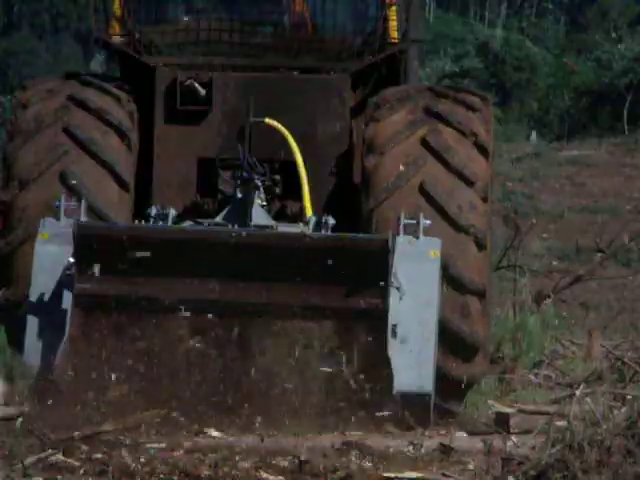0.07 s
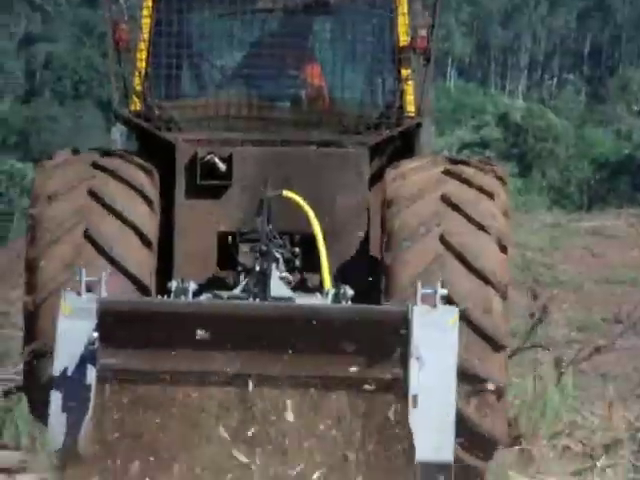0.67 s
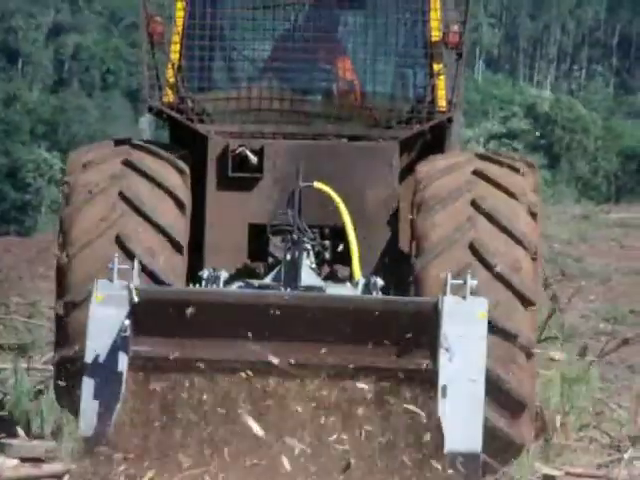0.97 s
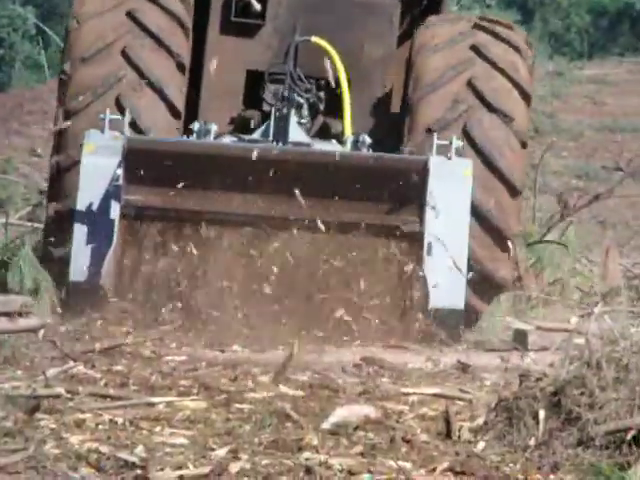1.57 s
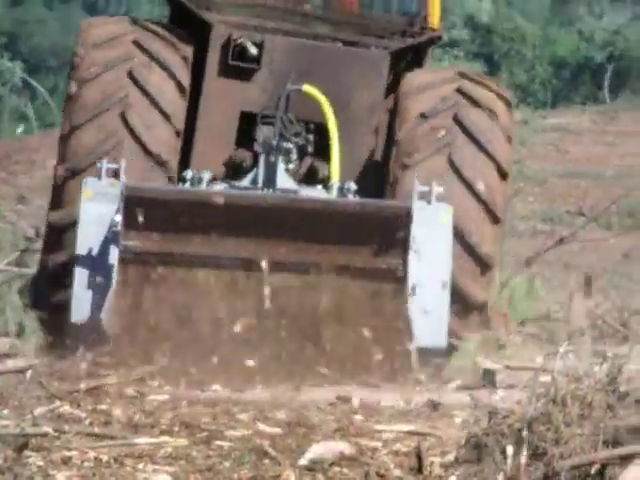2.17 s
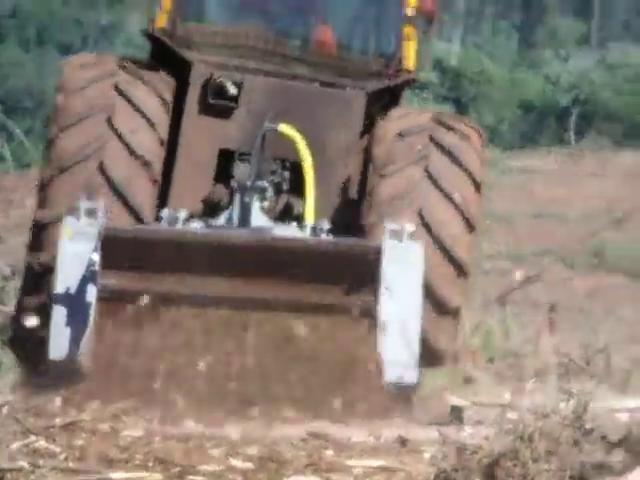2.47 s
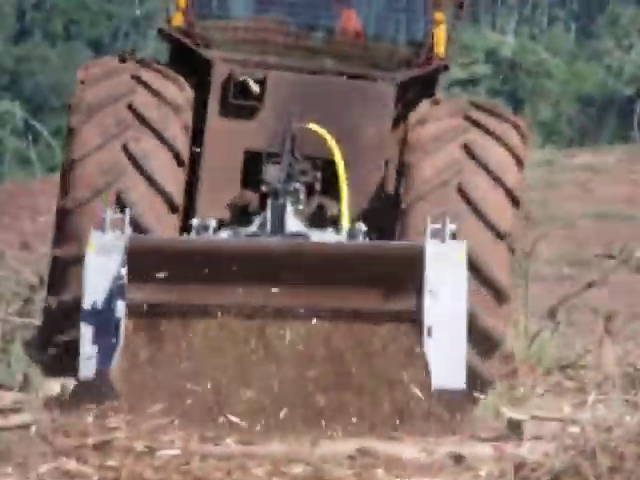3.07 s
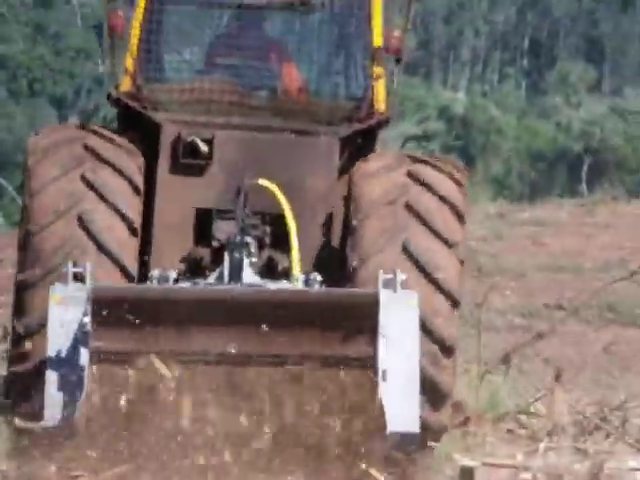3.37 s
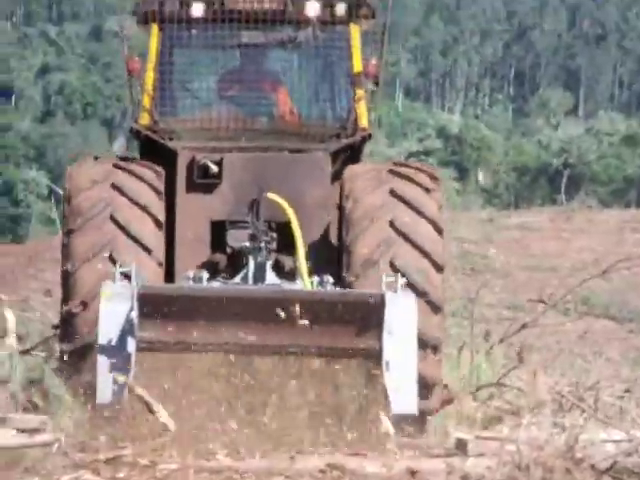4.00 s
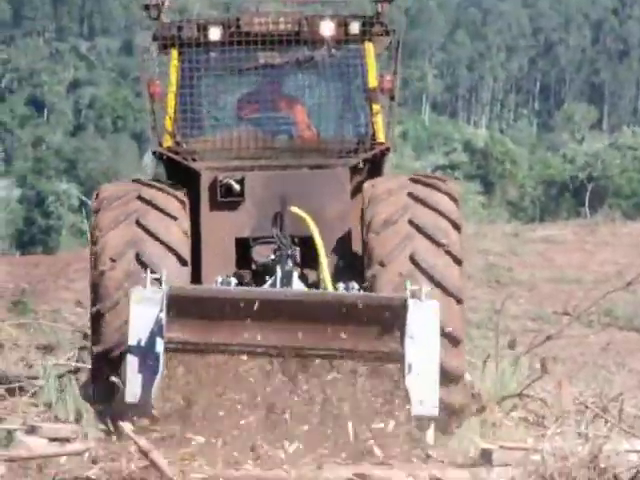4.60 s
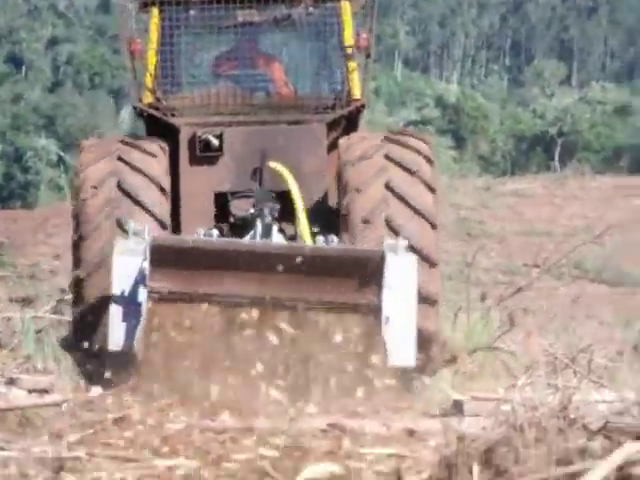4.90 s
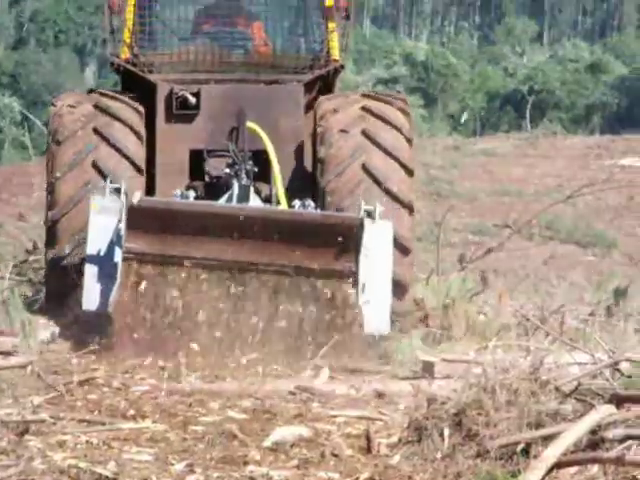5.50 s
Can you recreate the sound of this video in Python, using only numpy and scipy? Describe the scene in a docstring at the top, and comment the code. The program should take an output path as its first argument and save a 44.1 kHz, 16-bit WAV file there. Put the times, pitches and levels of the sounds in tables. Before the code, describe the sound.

A tractor's mulcher is heard shredding wood from the very start, a loud, harsh roar of drumming steel plates and crackling splinters that continues for the whole of nearly six seconds. It surges briefly and irregularly as branches are pulled in, notably around 0.6, 1.8, 3.1 and 3.9 seconds, and eases a little near 2.5 seconds. Sticks snap sharply throughout, with a strong crack at 0.3 seconds and a cluster between 4.1 and 5 seconds. Lumps of wood knock on the steel hood now and then, most clearly at about 3.2 and 4 seconds. A steady diesel hum and a faint gear whine sit underneath. Wind rumbles on the microphone, with thumping gusts near 1.3 seconds, repeatedly from 1.8, strongest from 3.2 to 3.9, and again around 5 seconds. The open field gives no echo; the treble is slightly dull and the loudest peaks overload.

```python
"""First comes the harsh, crackling roar of a tractor's mulcher chewing through wood in an open field.
Its spinning teeth hammer wood against a steel hood and tear it into splinters; sticks crack and
lumps knock on the plates. The diesel engine and a whining drive hum underneath. Gusts of wind
thump a dull-sounding microphone that overloads on the loudest peaks."""
import sys
import numpy as np
from scipy import signal
from scipy.fft import rfft, irfft
from scipy.io import wavfile
from scipy.ndimage import uniform_filter1d

SR = 44100
rng = np.random.default_rng(int(sys.argv[2]) if len(sys.argv) > 2 else 0)


def output_pcm(signal):
    """Save a mono or channel-first signal as 16-bit PCM at the path in sys.argv[1].

    Samples are clipped to [-1, 1] before scaling.
    """
    pcm = np.clip(np.atleast_2d(signal).T, -1, 1) * 32767
    wavfile.write(sys.argv[1], SR, np.round(pcm).astype(np.int16))


N = 249165
TIME = np.arange(N) / SR


# Tone colours of the drumming plates, ringing hood and tearing wood: pitch_hz, level_db
DRUM_TONE = [(150, -19.5), (450, -24.5), (600, -15.5), (760, -4), (870, -2.5), (1040, -2.5), (1150, -10.5),
             (1400, -11), (2500, -42), (6000, -90)]
HOOD_TONE = [(600, -33), (1150, -13), (1320, -5.5), (1440, 2), (1525, -0.5), (1620, 1.5), (1730, 0.5),
             (1860, -3), (2020, -9), (2210, -7.5), (2600, -15), (3100, -20), (5000, -51.5), (7000, -90.5)]
SPLINTER_TONE = [(1200, -19), (2400, -8), (3200, -10), (3850, -0.5), (4500, 1), (5000, -1), (5250, -5),
                 (5500, -17.5), (5750, -16), (6100, -28.5), (6600, -98), (8000, -92.5)]

def mulcher():
    """Wood drums on the plates, rings the hood and tears apart; all three surge with the same bites."""
    drum_gain, hood_gain, splinter_gain = workload()
    chewing = bites(per_s=150, fade_s=0.013, depth=0.37)
    drum = ring(impacts(per_s=6000, spread_db=4.0) * chewing, DRUM_TONE)
    roar = ring(impacts(per_s=5000, spread_db=2.0) * chewing, HOOD_TONE)
    tearing = chewing * bites(per_s=350, fade_s=0.0021, depth=0.92)
    crackle = ring(impacts(per_s=8000, spread_db=2.0) * tearing, SPLINTER_TONE)
    return unit(drum) * drum_gain + unit(roar) * hood_gain + unit(crackle) * splinter_gain


# The steady feed of twigs under the teeth: time_s, drum_db, hood_db, splinter_db
TWIG_FEED = [(0.08, -22.5, -17, -19.5), (0.25, -26, -17, -16), (1.2, -22.5, -17.0, -17.5),
             (1.35, -24, -17.5, -19.0), (1.72, -23, -18.0, -20.0), (2.43, -29.5, -18.0, -19.5),
             (2.5, -29, -22, -24.5), (2.82, -25, -20.0, -20.5), (3.0, -22, -14.5, -17.0),
             (3.4, -21.5, -17, -17.5), (3.8, -25.0, -16, -17), (4.1, -24, -18.5, -18.5),
             (4.25, -27.5, -21, -17.0), (4.6, -24.5, -17, -17.5), (4.7, -26.5, -22.0, -23.0),
             (5.05, -22.0, -17.5, -16), (5.22, -22.0, -21.5, -21.0), (5.65, -24, -17, -18.0)]
# Branches pulled in and shredded: start_s, length_s, drum_db, hood_db, splinter_db
BIG_BRANCHES = [(0.29, 0.18, -20.5, -14.5, -30), (0.41, 0.15, -20.5, -11, -26),
                (0.61, 0.094, -17, -12.5, -10), (0.73, 0.085, -26.5, -15, -20),
                (0.84, 0.1, -21.5, -13.5, -17.0), (0.98, 0.13, -25.0, -15, -16.5),
                (1.44, 0.15, -23.5, -12.5, -15), (1.779, 0.11, -23.5, -11, -13.5),
                (1.918, 0.092, -25, -18, -10.5), (2.08, 0.14, -19.5, -13.5, -20),
                (2.18, 0.14, -24.5, -23, -15), (2.34, 0.087, -20.5, -14.5, -17.5),
                (2.54, 0.038, -22, -19.0, -22.5), (2.85, 0.12, -27, -16, -15),
                (3.1, 0.13, -17.5, -10.5, -12), (3.48, 0.055, -15.5, -17, -25), (3.6, 0.076, -17, -21, -16),
                (3.868, 0.13, -15.5, -11.0, -10), (4.32, 0.11, -21.0, -15, -9),
                (4.46, 0.096, -29.0, -27, -11), (4.72, 0.094, -21.5, -17, -17.5),
                (4.84, 0.12, -20.5, -16.5, -11), (5.44, 0.075, -23.5, -16.5, -15)]

def workload(grab_s=0.039, clear_s=0.033, build_db=5.5):
    """Drum, hood and splinter gains: each branch adds to the feed, louder as it is pulled deeper."""
    power = undb(curves(TWIG_FEED)) ** 2
    for start_s, length_s, *levels_db in BIG_BRANCHES:
        unshredded = np.clip(1 - (TIME - start_s) / length_s, 0, 1)
        gain = swell(start_s, length_s, grab_s, clear_s) * undb(-build_db * unshredded)
        power += np.outer(undb(levels_db), gain) ** 2
    return np.sqrt(power)


def bites(per_s, fade_s, depth):
    """A gain that jumps each time the teeth catch a piece of wood, then dies back."""
    caught = (rng.random(N) < per_s / SR) * rng.exponential(size=N)
    flurry = signal.lfilter([1], [1, -np.exp(-1 / (fade_s * SR))], caught)
    return np.sqrt((1 + depth * flurry / flurry.mean()) / (1 + depth))


# Sticks that snap in the teeth: start_s, level_db, extra_rattle_db
STICK_SNAPS = [(0.2946, 3.5, -2), (0.41, -4.5, 1), (0.646, -7, -2), (0.9121, -2, -1), (1.1908, -6, 5),
               (1.527, -1, -1), (1.5704, -9, -1), (1.599, -3, -2), (1.9842, -1, 1), (2.0284, -1, 1),
               (2.2006, -4.5, 1), (2.361, -5, -5.5), (3.0152, -5.5, 0), (3.199, -1, -1), (4.151, -1, -3),
               (4.2756, -4, -1), (4.2892, -5, -1.5), (4.356, 0.5, 1.5), (4.431, -3, -1), (4.556, -1, -4),
               (4.797, -6.5, 2.5), (4.872, -8, -1), (4.97, -0.5, -0.5), (5.105, -4, -3), (5.269, -4, -3.5),
               (5.541, -4.5, -3.5), (5.626, -5.5, 0.5)]
# Tone colour of a breaking stick: pitch_hz, level_db
STICK_TONE = [(400, -13.5), (900, 3), (1600, 4), (2400, 10), (3200, 0.5), (4200, 14.5), (5100, 17),
              (5550, -12), (6100, -7), (6700, -65), (8000, -102)]

def snaps(crack_db=9, rattle_db=-2, rattle_s=0.0039):
    """A stick breaks with one sharp crack, then its splinters rattle off."""
    cracks, rattle = np.zeros(N), np.zeros(N)
    for start_s, level_db, extra_rattle_db in STICK_SNAPS:
        start = int(start_s * SR)
        cracks[start] = undb(level_db + crack_db)
        fade = np.exp(-TIME[:N - start] / rattle_s)
        rattle[start:] += undb(level_db + extra_rattle_db + rattle_db) * fade
    return ring(cracks + rattle * rng.standard_normal(N), STICK_TONE)


# Lumps of wood that knock on the hood: start_s, level_db
LUMP_KNOCKS = [(0.518, -5), (1.3, -4), (1.528, -3.5), (1.889, -4.5), (2.166, -10), (3.215, 1), (3.409, -6),
               (3.985, -2), (4.902, -4)]
# Tone colour of the struck steel plate: pitch_hz, level_db
PLATE_TONE = [(300, -37), (700, -7), (860, -5.5), (980, 9.5), (1200, -28), (1450, 0.5), (2500, -11.5),
              (6000, -89)]

def knocks(knock_db=-6, fade_s=0.018):
    """A lump rattles round inside the hood and sets its plate booming."""
    force = np.zeros(N)
    for start_s, level_db in LUMP_KNOCKS:
        start = int(start_s * SR)
        age_s = TIME[start:] - start_s
        force[start:] += undb(level_db) * np.exp(-age_s / fade_s)
    return undb(knock_db) * ring(force * rng.standard_normal(N), PLATE_TONE)


# The tones in the exhaust's hum: multiple_of_firing_rate, level_db
EXHAUST_TONES = [(1, -37), (2, -45), (9, -46), (11, -38)]
# Two gear tones of the drive that spins the teeth: time_s, low_tone_db, high_tone_db
GEAR_LEVELS = [(0.08, -43.5, -43), (0.8, -39, -39), (1.3, -34, -32), (1.8, -47, -39.5), (2.2, -47, -31.5),
               (2.65, -44, -35.5), (2.85, -44, -40), (3.1, -44, -33), (3.7, -43, -29.5), (4.7, -48, -31),
               (5.1, -47, -37.5), (5.65, -47, -37)]

def tractor(firing_hz=96.4, gears_hz=(578, 642), engine_db=-0.6, whine_db=-1.0):
    """The diesel's exhaust throbs and the gears whine, both following the engine's speed."""
    throb_db, waver_db = 3.0, 2.0
    speed = 1 + .001 * wander(6)  # the governor holds the engine speed almost still
    phase_per_hz = 2 * np.pi * np.cumsum(speed) / SR
    exhaust = sum(undb(level_db + throb_db * wander(12)) * np.sin(multiple * firing_hz * phase_per_hz)
                  for multiple, level_db in EXHAUST_TONES)
    whine = sum(undb(level_db + waver_db * wander(11)) * np.sin(pitch_hz * phase_per_hz)
                for pitch_hz, level_db in zip(gears_hz, curves(GEAR_LEVELS)))
    return np.sqrt(2) * (undb(engine_db) * exhaust + undb(whine_db) * whine)


# The breeze between gusts: time_s, level_db
BREEZE_LEVELS = [(0.08, -32), (0.45, -29), (0.62, -35), (1.1, -35.5), (1.6, -24.5), (2.17, -32.5),
                 (2.7, -29.5), (4.05, -26), (4.35, -35), (5.1, -24.5), (5.65, -31)]
# Gusts of wind: start_s, length_s, level_db
WIND_GUSTS = [(1.219, 0.12, -14.5), (1.828, 0.029, -12.5), (2.026, 0.04, -29), (2.263, 0.067, -25),
              (2.45, 0.14, -19.5), (2.705, 0.34, -19.5), (3.22, 0.34, -13.5), (3.595, 0.28, -17.5),
              (4.47, 0.046, -24.5), (4.86, 0.03, -19), (4.97, 0.066, -17), (5.096, 0.027, -22.5),
              (5.28, 0.033, -20.5)]
# Tone colours of the deep breeze and the brighter gusts: pitch_hz, level_db
BREEZE_TONE = [(15, -8.5), (30, 3), (60, 1.5), (120, 1.5), (190, -6), (300, -14.5), (600, -36), (1500, -50),
               (6000, -100)]
GUST_TONE = [(15, -21), (50, -3), (130, 0.5), (270, -3), (420, -8.5), (700, -15.5), (1400, -21),
             (3000, -78), (6000, -100)]

def wind(wind_db=-2.0, gusty_above_db=-23, flutter_db=3.5, wander_db=1.0):
    """The wind rumbles softly and breaks into brighter, separate flaps in the gusts."""
    calm_db, = curves(BREEZE_LEVELS)
    power = undb(calm_db + wander_db * wander(16)) ** 2
    for start_s, length_s, level_db in WIND_GUSTS:
        power += (undb(level_db) * swell(start_s, length_s, rise_s=0.018, fall_s=0.026)) ** 2
    total_db = 10 * np.log10(power)
    flap_share = 1 / (1.5 + np.exp((gusty_above_db - total_db) / 3))  # stronger wind flaps more
    breeze = unit(ring(rng.standard_normal(N), BREEZE_TONE))
    flaps = impacts(per_s=280, spread_db=1.3) * undb(flutter_db * wander(70))
    flapping = unit(ring(flaps, GUST_TONE))
    blend = np.sqrt(1 - flap_share) * breeze + np.sqrt(flap_share) * flapping
    return undb(total_db + wind_db) * blend


# Swirls of air that hit the microphone: start_s, level_db, pitch_hz
AIR_SWIRLS = [(1.234, -7, 145), (1.302, -1, 160), (1.342, -13, 169), (1.596, -15, 200), (1.843, -11, 143),
              (1.936, -11, 147), (2.032, -11, 161), (2.268, -1, 260), (2.329, -10.5, 191), (2.584, -7, 121),
              (2.823, -11.5, 121), (3.022, -11, 277), (3.271, -7, 130), (3.364, -4, 286), (3.414, -6, 178),
              (3.474, -7.5, 264), (3.533, -4, 151), (3.575, -6.5, 205), (3.616, -7, 380),
              (3.721, -13.5, 140), (3.806, -10.5, 148), (3.875, -11.5, 182), (4.262, -15, 121),
              (4.48, -12, 220), (4.863, -2.5, 287), (5.004, -12, 120)]

def wind_thumps(swirl_db=-7, rise_s=0.00528):
    """Each swirl of air gives the microphone one push and pull, thumping at its own pitch."""
    swirl, thumps = np.zeros(N), np.zeros(N)
    for start_s, level_db, pitch_hz in AIR_SWIRLS:
        start = int(start_s * SR)
        near = slice(start, start + SR // 10)
        rise = (TIME[near] - start_s) / rise_s
        swirl[near] += undb(level_db) * rise * np.exp(1 - rise)
        swing = 2 * np.pi * pitch_hz * (TIME[near] - start_s - rise_s)
        thumps[near] += undb(level_db) * swing * np.exp((1 - swing ** 2) / 2)
    return thumps + undb(swirl_db) * ring(swirl * rng.standard_normal(N), GUST_TONE)


def impacts(per_s, spread_db):
    """Random clicks, many small and a few large."""
    hit = rng.random(N) < per_s / SR
    size = undb(spread_db * np.minimum(rng.exponential(size=N), 5))
    return unit(hit * size * rng.choice([-1, 1], N))


def ring(x, tone, size=4096):
    """Make every click in x ring with the given tone colour."""
    pitch_hz, level_db = np.transpose(tone)
    grid_hz = np.maximum(np.arange(size // 2 + 1) * SR / size, 1)
    gains = undb(np.interp(np.log(grid_hz), np.log(pitch_hz), level_db))
    # Folding the second half onto the first puts the ringing after the click, never before it.
    folded = irfft(np.log(gains))
    folded[1:size // 2] *= 2
    folded[size // 2 + 1:] = 0
    ringing = irfft(np.exp(rfft(folded)))
    return signal.fftconvolve(x, ringing / np.linalg.norm(ringing))[:N]


def swell(start_s, length_s, rise_s, fall_s):
    """A gain that rises, holds until the length is over and dies away."""
    age_s = TIME - start_s
    return np.clip(age_s / rise_s, 0, 1) * np.exp(-np.maximum(age_s - length_s, 0) / fall_s)


def wander(per_s):
    """A smooth random drift with a typical size of 1."""
    hold = max(int(SR / per_s), 1)
    steps = np.repeat(rng.standard_normal(N // hold + 1), hold)
    return unit(uniform_filter1d(uniform_filter1d(steps, hold), hold)[:N])


def curves(table):
    """Join a timed table's rows with straight lines, one curve for each level column."""
    time_s, *columns = np.transpose(table)
    return [np.interp(TIME, time_s, column) for column in columns]


def undb(db):
    """Turn decibels into a gain, the number a sound is multiplied by."""
    return 10 ** (np.asarray(db) / 20)


def unit(x):
    """Scale to an average (rms) level of 1."""
    return x / np.sqrt(np.mean(x ** 2))


def scene():
    """Open ground: every sound arrives directly, with no echo."""
    return (mulcher() + snaps() + knocks() + tractor() + wind() + wind_thumps())[None]


def record(dry, start_s=.074, overload=.73, top_hz=15800):
    """The microphone comes on after a moment, flattens the loudest peaks and dulls the treble."""
    opened = dry * (TIME >= start_s)
    flattened = opened / (1 + np.abs(opened / overload) ** 24) ** (1 / 24)
    dulling = signal.firwin2(31, [0, 5000, 7500, SR / 2], [1, 1, .6, .55], fs=SR)
    dulled = signal.convolve(flattened, dulling[None], "same")
    top_cut = signal.ellip(8, .1, 60, top_hz, fs=SR, output="sos")
    return signal.sosfiltfilt(top_cut, dulled)


dry = scene()
out = record(dry)
output_pcm(out)
```